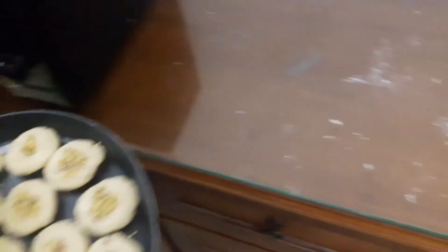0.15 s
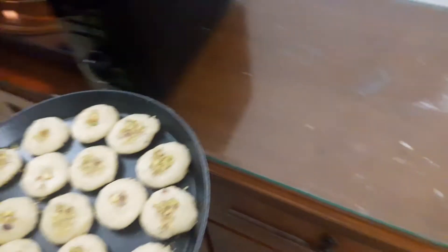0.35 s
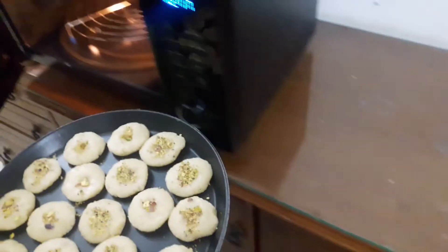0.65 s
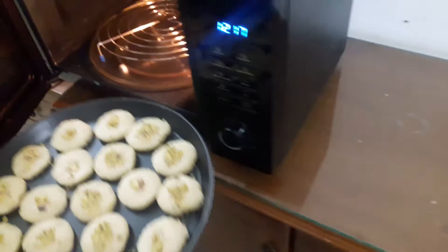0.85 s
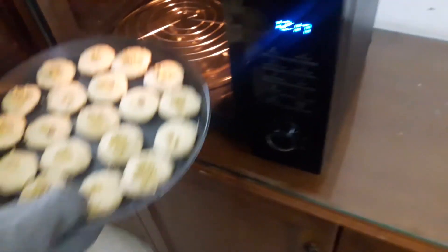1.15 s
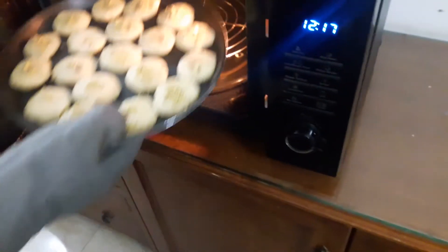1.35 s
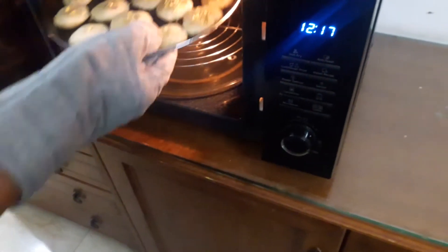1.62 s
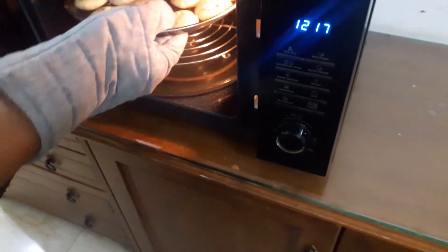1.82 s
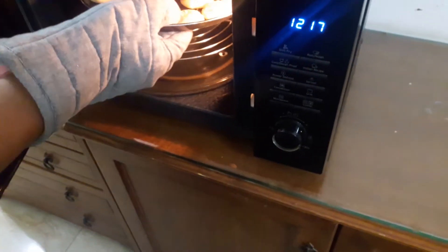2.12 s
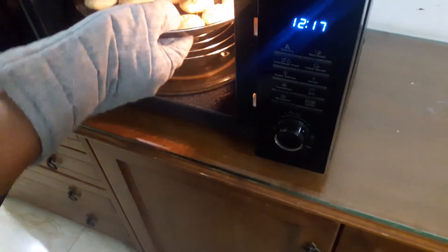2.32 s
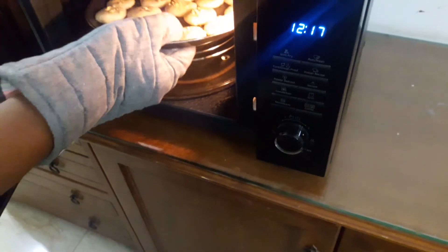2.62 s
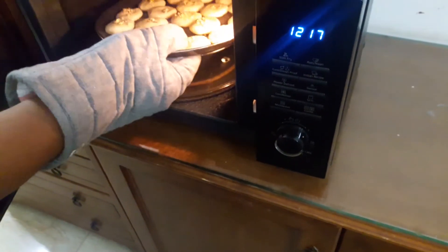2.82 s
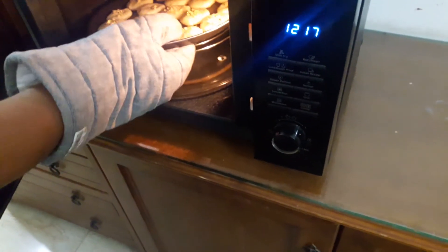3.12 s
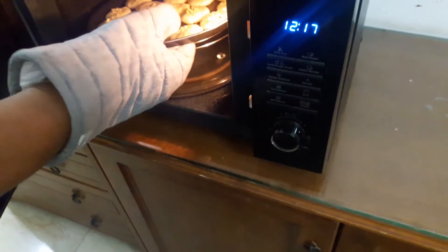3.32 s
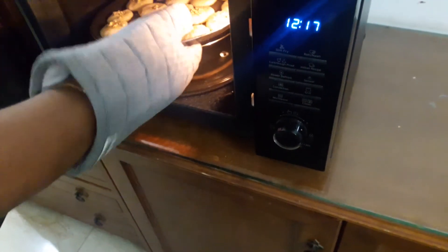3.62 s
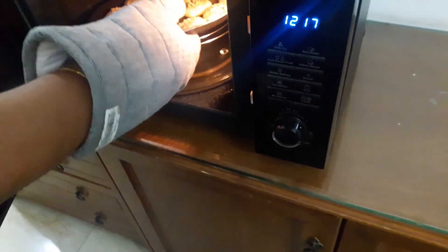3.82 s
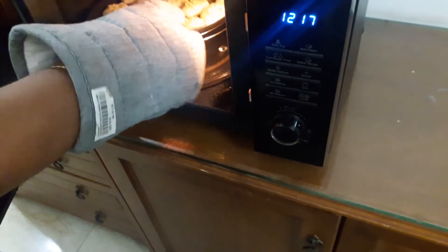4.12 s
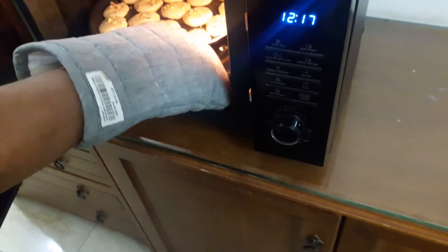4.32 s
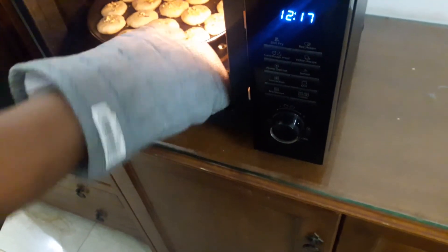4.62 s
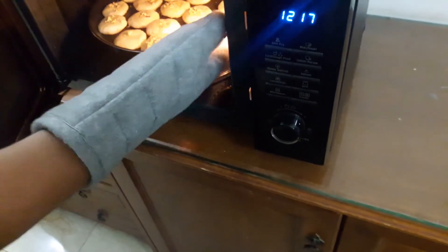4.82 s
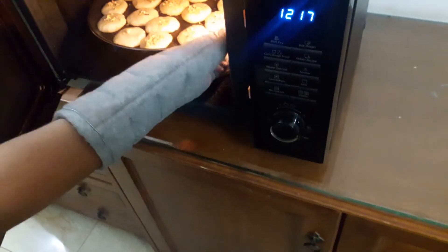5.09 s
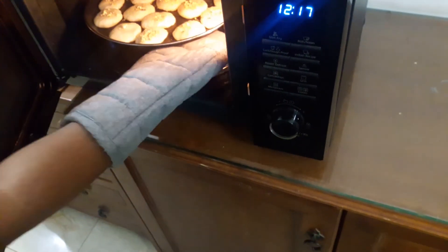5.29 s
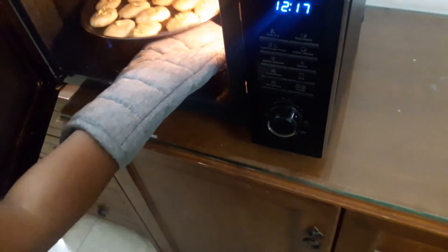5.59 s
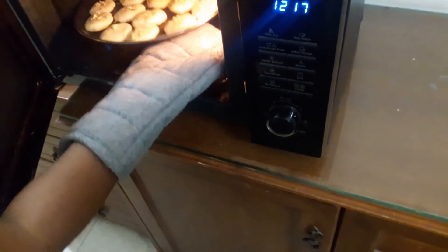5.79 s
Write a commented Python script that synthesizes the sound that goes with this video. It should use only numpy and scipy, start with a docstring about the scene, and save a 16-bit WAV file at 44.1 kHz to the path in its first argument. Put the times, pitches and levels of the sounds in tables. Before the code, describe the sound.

Heard up close in a small kitchen, a microwave door opens with latch clicks and a run of dull thuds. Then a metal baking tray lands on the wire rack inside and bumps across it with a short, ringing clatter. A second shove and several separate knocks follow as it is pushed into place. The soft brushing of an oven mitt and a faint hum lie underneath.

```python
"""A latch clicks and a microwave door judders open, close by in a small kitchen.
A metal baking tray clatters onto the wire rack, bumps across it and is nudged home with an oven mitt.
Each blow is a thud, a body and a clack that set the struck part ringing and fill the room.
Cloth fibres catch and slip in soft swells, a thin whine passes as the door opens,
and a faint appliance hum lies under it all."""
import sys
import numpy as np
from scipy import signal
from scipy.fft import rfft, irfft
from scipy.io import wavfile
from scipy.ndimage import uniform_filter1d

SR = 44100
rng = np.random.default_rng(int(sys.argv[2]) if len(sys.argv) > 2 else 0)


def bounce(signal):
    """Save signal as a 16-bit WAV file at the path given by the first command-line argument."""
    frames = np.transpose(np.atleast_2d(signal))
    limited = np.clip(frames, -1, 1)
    pcm = np.round(limited * 32767).astype(np.int16)
    wavfile.write(sys.argv[1], SR, pcm)


N = 262395

# the tray lands on the rack or hits the oven wall: start_s, thud_db, body_db, clack_db, clack_hz
TRAY_HITS = [(2.804, -17, -19.5, -37.5, 4480), (2.8146, -31, -15.5, -13, 4930),
             (2.819, -22.5, -14, -15.5, 4900), (2.9645, -23, -20.5, -13.5, 4900),
             (3.004, -24.5, -22, -27, 4520), (3.055, -23.5, -25.5, -38, 3500), (4.379, -14, -18, -13, 3350),
             (4.387, -14.5, -25.5, -18.5, 3260), (4.428, -14.5, -28, -25.5, 2400)]
# the tray slides over the wires: start_s, hardest_s, end_s, bumps_per_s, thud_db, body_db, clack_db
TRAY_SHOVES = [(2.846, 2.935, 2.961, 45.2, -9, -23, -28.5), (4.333, 4.365, 4.402, 84.8, -10, -19.5, -24.5)]
# the door judders on its catch and hinge: start_s, hardest_s, end_s, thud_db
DOOR_PULLS = [(.254, 0.259, 0.27, -15), (.425, 0.437, 0.5, -8.5), (.815, .9, 0.97, -3)]
# nudges that rock the rack: start_s, thud_db, body_db, clack_db, clack_hz
RACK_NUDGES = [(2.343, -34, -41, -52, 3530), (3.69, -35, -29, -46, 4500), (3.714, -28, -26, -33, 3460),
               (3.722, -23.5, -24, -32.5, 3000), (5.2785, -26, -28.5, -22.5, 5650),
               (5.282, -14.5, -16, -19.5, 2430), (5.769, -24, -38, -60, 3500),
               (5.788, -24, -18, -29.5, 3720), (5.797, -13, -16, -24.5, 3530)]
# the ring of the tray, the door and the rack: pitch_hz, relative_db, t60_s
TRAY_MODES = [(152, 0, 0.3), (189, -4, .13), (225.9, 0.5, 0.31), (301, 2, 0.15), (326.9, -7, 0.54),
              (376, 1.5, 0.25), (556, -11, 0.39), (624.7, 2.5, 0.29), (700, 7, 0.044), (922, -7.5, 0.33),
              (963, 9, .07), (1123.5, 4, 0.21), (1176, 13.5, 0.053), (1179, -5, 0.43), (1570, -2, 0.34),
              (2050, -12, .3), (2102, 9, 0.088), (2261, -5, 0.4), (2308, 8, 0.12), (3150, -2, 0.17),
              (3364, 10.5, 0.045), (3510, 1, 0.22), (3720, 5, 0.034), (4520, 12, 0.07), (5254, 3, 0.048)]
DOOR_MODES = [(114, -1.5, 0.75), (137.3, -8, 0.4), (208, -1, 0.26), (231, 4.5, 0.15), (319, 1, 0.19),
              (388.4, -4, 0.4), (440.6, -3, .25), (527, 0, 0.1), (711, -2, .18), (880, -3.5, 0.12)]
RACK_MODES = [(221.8, 1, 0.36), (308, -7, 1), (379, 5, 0.11), (421.4, 4, 0.19), (581.4, -11, 0.24),
              (712, 5.5, 0.098), (900, 7.5, 0.11), (968, 6, 0.056), (1220, -3.5, 0.59), (1305, 1, 0.085),
              (1687, 11.5, 0.033), (2116, -8, 0.4), (2330, 9.5, 0.11), (2950, -13, 0.067),
              (3475, 15.5, 0.043), (5470, 14, 0.038)]
# ticks of the latch and the tray rim: start_s, level_db, pitch_hz, t60_s
LATCH_AND_RIM_CLICKS = [(.109, -32, 5900, 0.1), (.240, -32, 3400, .06), (.303, -27.5, 5700, .022),
                        (.483, -28, 9000, .02), (.548, -30, 5650, 0.029), (0.8899, -4, 3680, 0.0034),
                        (.892, -22.5, 4260, 0.055), (2.264, -50.5, 3780, 0.11), (2.518, -47.5, 7350, 0.08),
                        (2.702, -45, 4400, 0.2), (2.814, -15, 13000, 0.06), (2.964, -11, 14000, 0.071),
                        (3.323, -45.5, 4500, 0.052), (5.7824, -29.5, 4870, 0.056)]
# single rack wires left singing by a blow: start_s, level_db, pitch_hz, t60_s
SINGING_WIRES = [(3.72, -47.5, 1190, 0.41), (3.757, -44, 9800, .07), (4.38, -35, 9230, 0.18),
                 (5.797, -38, 1210, 0.6)]
# strokes of the mitt over metal: peak_s, swell_s, level_db
MITT_STROKES = [(.03, 0.14, -57.5), (.42, 0.36, -48), (.98, 0.41, -48), (1.28, 0.089, -45),
                (1.52, 0.088, -51), (3.1, .15, -49.5), (3.68, .16, -47), (4.38, .19, -50.5),
                (4.9, 0.067, -58.5), (5.09, 0.033, -45), (5.39, 0.26, -48.5), (5.95, 0.13, -55)]
# quick flicks of the mitt: peak_s, half_length_s, level_db
MITT_FLICKS = [(1.172, 0.12, -51.5), (1.284, 0.05, -45), (5.084, 0.032, -47.5)]
# the cloth's tone in a stroke and in a brighter flick: frequency_hz, relative_db
STROKE_EQ = [(300, -19.5), (1200, -1.5), (2300, -6), (3300, -1), (4200, 1.5), (5200, -2), (6800, -0.5),
             (9000, -3.5), (15000, 1.5)]
FLICK_EQ = [(1000, -22), (3000, -12), (4500, -6.5), (5800, 3), (6900, -0.5), (9000, -5), (15000, -6.5)]
# partials of the appliance hum: pitch_hz, relative_db
HUM_PARTIALS = [(96.9, -59.5), (145.3, -66.5), (220.7, -64), (387.6, -83), (559.9, -74.5)]
# noise beds (dull room tone, a narrow hiss, each channel's own hiss): frequency_hz, gain_db
ROOM_TONE_EQ = [(40, -30.5), (90, -36), (220, -38.5), (400, -42.5), (1000, -51), (2000, -61), (4000, -73.5),
                (15000, -60.5)]
THIN_HISS_EQ = [(2500, -105), (3700, -78), (4150, -63.5), (4650, -80), (6500, -105)]
CHANNEL_HISS_EQ = [(100, -67.5), (1000, -63), (2500, -69), (6000, -83), (15000, -58)]
# the kitchen's reverb time: frequency_hz, t60_s
KITCHEN_DECAY = [(100, 0.75), (260, 0.72), (700, 0.61), (1840, 0.79), (4850, 0.49), (14000, 0.44)]
# the reverb's level against the direct sound: frequency_hz, gain_db
KITCHEN_SEND = [(120, -0.5), (400, 1), (1100, -4.5), (2500, -9), (5000, -9.5), (14000, -7.5)]
# the small microphone's response: frequency_hz, gain_db
MIC_EQ = [(25, -30), (55, -16), (110, -3), (5300, 2), (6300, -3), (7100, -10), (7900, -23.5), (9500, -21),
          (11500, -23.5), (15000, -19.5)]


def tray():
    """The metal tray lands and rings; as it slides, it bumps once on each wire it crosses."""
    bumps = []
    for start, hardest, end, per_s, *levels_db in TRAY_SHOVES:
        bumps += judder(start, hardest, end, per_s, levels_db, fade_db_per_s=88, clack_hz=3680)
    return strike(TRAY_HITS + bumps, TRAY_MODES, clatter_t60=0.082, ring_db=-25.5,
                  sub_db=1, bass_db=-1, valley_db=-4.5, top_db=-13)


def door(knocks_per_s=48, body_db=-18.5, clack_db=-33):
    """The door sticks and slips in equally dull knocks: body and clack ride a fixed step below the thud."""
    knocks = []
    for start, hardest, end, thud in DOOR_PULLS:
        levels_db = (thud, thud + body_db, thud + clack_db)
        knocks += judder(start, hardest, end, knocks_per_s, levels_db, fade_db_per_s=172, clack_hz=3420)
    return strike(knocks, DOOR_MODES, clatter_t60=0.13, ring_db=-23.5,
                  sub_db=-14, bass_db=-3, valley_db=0, top_db=-6)


def rack():
    """The wire rack rocks and rings at each nudge."""
    return strike(RACK_NUDGES, RACK_MODES, clatter_t60=0.067, ring_db=-26,
                  sub_db=-5, bass_db=-1.5, valley_db=1.5, top_db=-11)


def judder(start, hardest, end, per_s, levels_db, fade_db_per_s, clack_hz, jitter=0.1501):
    """Stick and slip: a run of nearly even blows that build to the hardest one, then weaken."""
    gaps = max(round((end - start) * per_s), 1)
    times = np.linspace(start, end, gaps + 1)
    times[1:] += jitter / per_s * rng.uniform(-1.002, 1, gaps)
    return [(s, *(np.array(levels_db) - fade_db_per_s * abs(s - hardest)), clack_hz) for s in times]


def strike(blows, modes, clatter_t60, ring_db, sub_db, bass_db, valley_db, top_db):
    """Each blow is a burst with a low thud, a body and a bright clack; the same curve drives the modes."""
    out, t = np.zeros(N), np.arange(SR) / SR
    hz, db, t60 = np.transpose(modes)[:, :, None]
    attack = 1 - np.exp(-t * hz / 1.03)  # a mode needs about a cycle to get going
    ringing = amp(db + ring_db - 60 * t / t60) * np.exp(2j * np.pi * hz * t) * attack
    for start, thud, body, clack, clack_hz in blows:
        blow_eq = [(60, thud + sub_db), (120, thud + bass_db), (240, thud),
                   (600, (thud + body) / 2 - 1), (1150, body), (1700, (body + clack) / 2 + valley_db),
                   (clack_hz, clack), (1.98 * clack_hz, clack + top_db)]
        add(out, start, equalise(clatter(clatter_t60), blow_eq))
        drive = amp(curve_at(blow_eq, hz[:, 0]))
        phases = np.exp(2j * np.pi * rng.random(len(hz)))
        add(out, start, ((drive * phases) @ ringing).real)
    return out


def clatter(t60, size=8192, passes=2):
    """Close metal walls scatter a blow into a dying burst with no favoured pitch."""
    fade = amp(-60 * np.arange(size) / SR / t60)
    burst = fade * rng.standard_normal(size)
    for _ in range(passes):
        whitened = irfft(np.exp(1j * np.angle(rfft(burst))))
        burst = whitened * fade / (fade + .02)  # gate what smears past the burst
    return unit_rms(burst) * np.sqrt(np.mean(fade ** 2))


def clicks():
    """Short hard contacts of latch and rim, each bright around its own pitch."""
    out = np.zeros(N)
    for start, db, hz, t60 in LATCH_AND_RIM_CLICKS:
        click_eq = [(hz / 5, db - 23.5), (hz / 2, db - 10.5), (hz, db), (hz * 1.67, db - 13)]
        add(out, start, equalise(clatter(t60), click_eq))
    return out


def wires():
    """A struck rack wire sings on with one dying tone."""
    out, t = np.zeros(N), np.arange(SR) / SR
    for start, db, hz, t60 in SINGING_WIRES:
        add(out, start, amp(db - 60 * t / t60) * np.sin(2 * np.pi * hz * t))
    return out


def mitt(swell_db=10, release_ratio=1.095):
    """Cloth on metal: a stroke gains swell_db in its swell time and dies more slowly; flicks add sparkle."""
    t = np.arange(N) / SR
    stroke_power = np.zeros(N)
    for peak, swell_s, db in MITT_STROKES:
        from_peak_s = np.maximum(peak - t, (t - peak) / release_ratio)
        stroke_power += amp(db - swell_db * from_peak_s / swell_s) ** 2
    flicks = sum(amp(db) * np.exp(-((t - peak) / half_s) ** 4) for peak, half_s, db in MITT_FLICKS)
    return fibres(STROKE_EQ) * np.sqrt(stroke_power) + fibres(FLICK_EQ) * flicks


def fibres(eq, grain_db=1, grain_hz=170):
    """Cloth fibres catch and slip, making a grainy hiss."""
    grainy = rng.standard_normal(N) * amp(grain_db * drift(grain_hz))
    return unit_rms(equalise(grainy, eq))


def whine(start_s=0.252, attack_s=.035, hold_s=.125, t60_s=.28, level_db=-46, flutter_db=3,
          pitch_hz=11260, glide_hz=420, settle_s=0.06, waver_hz=12):
    """A thin tone as the door opens and the lamp comes on: it glides up, settles and fades."""
    t = np.maximum(np.arange(N) / SR - start_s, 0)
    hz = pitch_hz - glide_hz * np.exp(-t / settle_s) + waver_hz * drift(90)
    db = level_db + flutter_db * drift(25) - 60 * np.maximum(t - hold_s, 0) / t60_s
    attack = np.minimum(t / attack_s, 1) ** 2
    return attack * amp(db) * sine(hz)


def kitchen(x, build_s=0.0071, smooth_bins=81):
    """The room's reverb builds after the direct sound; each band dies at its own speed."""
    hz, t, noise = signal.stft(rng.standard_normal(SR), SR, nperseg=256)
    fade = amp(-60 * t / curve_at(KITCHEN_DECAY, hz)[:, None])
    fade *= 1 - np.exp(-(t / build_s) ** 2)
    band_energy = np.mean(fade ** 2, axis=1, keepdims=True) * SR
    fade *= amp(curve_at(KITCHEN_SEND, hz))[:, None] / np.sqrt(band_energy)
    response = rfft(signal.istft(noise * fade, SR, nperseg=256)[1], 2 * SR)
    # the reverb's spectrum is smoothed, so its tail is even and no single pitch booms
    magnitude = np.sqrt(abs(uniform_filter1d(abs(response) ** 2, smooth_bins)))
    tail = irfft(magnitude * np.exp(1j * np.angle(response)))[:SR]
    tail *= np.cos(np.pi / 2 * np.arange(SR) / SR) ** 2
    return signal.fftconvolve(x, tail)[:N]


def hum(waver_hz=2.42, trim_db=-1):
    """An appliance drones faintly, each partial wavering in pitch on its own."""
    return sum(amp(db + trim_db) * unit_rms(sine(hz + waver_hz * drift(5.6))) for hz, db in HUM_PARTIALS)


def room_tone():
    """A steady bed of dull air with a narrow band of hiss on top."""
    return sum(equalise(rng.standard_normal(N), eq) for eq in (ROOM_TONE_EQ, THIN_HISS_EQ))


def amp(db):
    """Decibels to gain."""
    return 10 ** (np.asarray(db) / 20)


def unit_rms(x):
    """Normalises to rms 1."""
    return x / np.sqrt(np.mean(x ** 2) + 1e-20)


def sine(hz):
    """An oscillator that follows a pitch curve."""
    return np.sin(2 * np.pi * np.cumsum(hz) / SR)


def drift(rate_hz):
    """Smooth random modulation of rms 1."""
    hz = np.fft.rfftfreq(N, 1 / SR)
    return unit_rms(irfft(rfft(rng.standard_normal(N)) * np.exp(-(hz / rate_hz) ** 2), N))


def curve_at(points, hz):
    """Reads (frequency_hz, value) breakpoints on a log-frequency axis."""
    point_hz, value = np.transpose(points)
    return np.interp(np.log(hz + 1), np.log(point_hz + 1), value)


def equalise(x, points, size=4096):
    """Minimum-phase EQ through (frequency_hz, gain_db) breakpoints."""
    hz = abs(np.fft.fftfreq(size, 1 / SR))
    log_gain = np.log(amp(curve_at(points, hz)))
    taps = np.fft.ifft(np.exp(np.conj(signal.hilbert(log_gain)))).real
    return signal.oaconvolve(x, taps[:size // 2])[:len(x)]


def add(mix, start_s, sound):
    """Lays a sound into the mix."""
    part = mix[round(start_s * SR):][:len(sound)]
    part += sound[:len(part)]


def scene(impact_trim_db=-2):
    """Only the impacts feed the reverb; both channels carry one mix, each over its own faint hiss."""
    impacts = amp(impact_trim_db) * (door() + tray() + rack() + clicks())
    mix = impacts + kitchen(impacts) + wires() + mitt() + whine() + hum() + room_tone()
    return np.array([mix + equalise(noise, CHANNEL_HISS_EQ) for noise in rng.standard_normal((2, N))])


def record(dry, high_cut_hz=15900):
    """A small microphone with thin bass and a deep drop above 7 kHz, then a steep high cut."""
    heard = np.array([equalise(channel, MIC_EQ) for channel in dry])
    high_cut = signal.firwin(255, high_cut_hz, window=("kaiser", 8), fs=SR)
    return signal.oaconvolve(heard, high_cut[None], "same", axes=1)


dry = scene()
out = record(dry)
bounce(out)
```